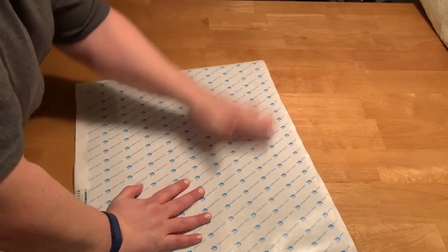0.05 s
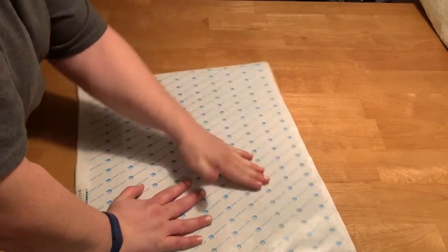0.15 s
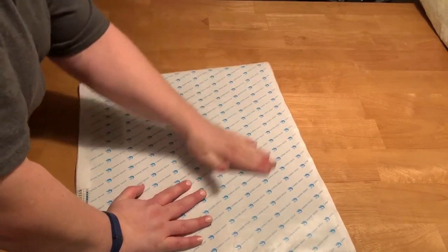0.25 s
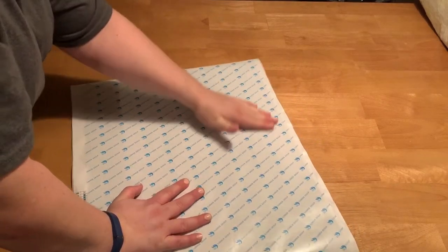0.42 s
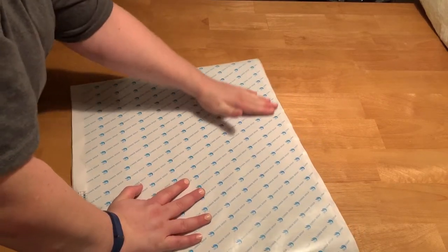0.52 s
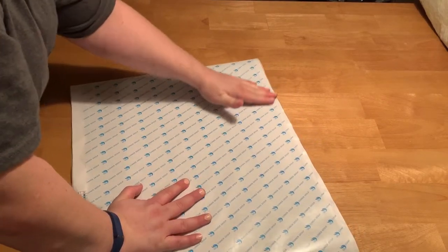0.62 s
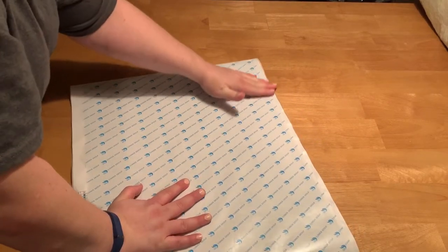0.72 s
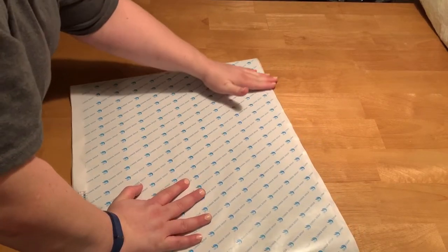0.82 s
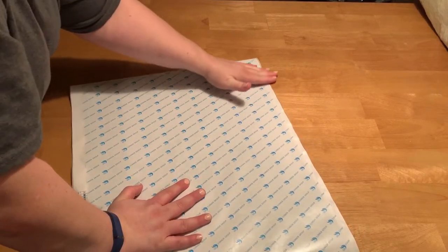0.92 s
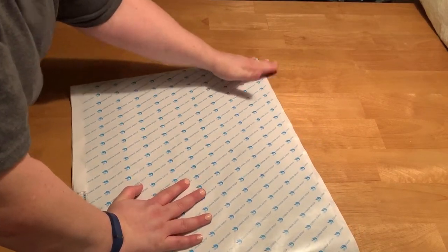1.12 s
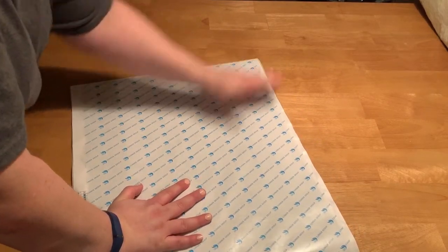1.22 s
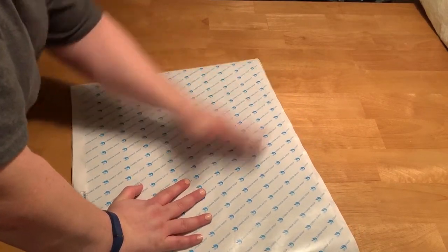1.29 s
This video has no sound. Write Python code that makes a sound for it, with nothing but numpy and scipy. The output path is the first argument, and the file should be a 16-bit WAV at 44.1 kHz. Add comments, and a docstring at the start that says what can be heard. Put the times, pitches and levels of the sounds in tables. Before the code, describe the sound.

A palm sweeps across a plastic sheet on a wooden table, with one sharp crackling snap

```python
"""Palm sweeping a plastic cover sheet

A small quiet room with a faint wavering hum; a wooden table under a plastic sheet, heard in mono.
A palm lands, sweeps across and lifts off: shaped noise for skin on film, close and with no room on it.
The sheet snaps once sharply, with quick reflections, and ticks softly (damped broad resonances);
the table thuds (decaying sines). Snaps, flaps and thuds also return from the walls as a short noise tail."""
import sys
import numpy as np
from scipy import signal
from scipy.fft import rfft, irfft, next_fast_len
from scipy.io import wavfile
from scipy.ndimage import map_coordinates

SR = 44100
rng = np.random.default_rng(int(sys.argv[2]) if len(sys.argv) > 2 else 0)


def wrap_up_sound(samples):
    """Save the sound to the file named by the first command line argument, as 16-bit audio."""
    columns = np.atleast_2d(samples).T
    # keep every value between -1 and 1, then stretch to whole-number steps
    tamed = np.clip(columns, -1, 1)
    steps = np.round(tamed * 32767).astype(np.int16)
    wavfile.write(sys.argv[1], SR, steps)


N = 59535
T = np.arange(N) / SR


def amp(db):
    """Decibels to gain."""
    return 10 ** (np.asarray(db) / 20)


def unit(x):
    """Scale to rms 1."""
    return x / np.sqrt(np.mean(x ** 2) + 1e-20)


def decay(t, t60):
    """Exponential decay that falls 60 dB in t60 seconds."""
    return np.exp(-np.log(1000) * t / t60)


def wobble(rate):
    """A smooth random curve with rate knots a second."""
    knots = rng.standard_normal(int(N * rate / SR) + 4)
    return map_coordinates(knots, [T * rate])


def filtered(x, response):
    """Multiply the spectrum of x by a response of frequency."""
    size = next_fast_len(N + 8192)
    hz = np.fft.rfftfreq(size, 1 / SR)
    return irfft(rfft(x, size) * response(hz), size)[:N]


def noise(points):
    """Noise of rms 1, its spectrum drawn through (pitch_hz, level_db) points."""
    point_hz, point_db = np.transpose(points)

    def response(hz):
        return amp(np.interp(np.log(hz + 1), np.log(point_hz), point_db))

    return unit(filtered(rng.standard_normal(N), response))


def add(track, start_s, sound):
    """Mix a sound into the track at start_s, cut at the track's end."""
    part = track[round(start_s * SR):][:len(sound)]
    part += sound[:len(part)]


# Spectrum of the quiet room: pitch_hz, level_db (relative, per Hz)
ROOM_NOISE = [(22, -37), (40, -9.5), (58, 3), (90, -1.5), (150, -8), (240, -1), (400, -11), (800, -13.5),
              (1150, -17.5), (1600, -15.5), (2400, -24), (3500, -24.5), (4200, -47), (15500, -44.5),
              (16500, -52.5)]
# Steady hum lines, before waver and swell: pitch_hz, level_db (rms)
HUM_LINES = [(118.6, -61.5), (215.3, -71.5), (290.7, -75), (527.6, -76)]
# Slow swell of the lowest hum line: time_s, change_db
LOW_HUM_SWELL = [(0, 4.5), (.15, -3.5), (.35, -8), (.63, -7), (.78, 1), (1.12, 2.5), (1.35, -7.5)]
ROOM_NOISE_DB, HUM_WAVER_DB = -59, 1  # rms level; typical waver


def background():
    """Room noise, and hum as sines that waver in level; the lowest also swells and sinks."""
    lines = []
    for hz, db in HUM_LINES:
        level = amp(db + HUM_WAVER_DB * wobble(5.11))
        lines.append(level * np.sqrt(2) * np.sin(2 * np.pi * (hz * T + rng.random())))
    swell = amp(np.interp(T, *np.transpose(LOW_HUM_SWELL)))
    return amp(ROOM_NOISE_DB) * noise(ROOM_NOISE) + swell * lines[0] + sum(lines[1:])


def room(x):
    """Diffuse answer from the walls: a decaying noise tail after a short gap."""
    t60_s, level_db, gap_s = 0.12, -9.5, 0.0036
    tail = rng.standard_normal(N) * decay(T, t60_s) * (T > gap_s)
    return amp(level_db) * signal.fftconvolve(x, tail / np.linalg.norm(tail))[:N]


# The hand pressing on the table: start_s, level_db
THUMPS = [(.008, -54.5), (0.2466, -51), (0.2552, -41), (0.403, -54.5), (1.187, -50)]
# Low modes of the table top: pitch_hz, level_db (relative), t60_s
TABLE_MODES = [(91.2, -1.5, 0.13), (189, -4.5, .07), (259, -3, 0.058), (302, 2.5, 0.063),
               (350.3, -1.5, 0.056), (805, -13.5, 0.032)]


def table():
    """The soft palm rings the table's modes; their balance varies a little with each press."""
    attack_s = 0.0024
    out = np.zeros(N)
    for start_s, db in THUMPS:
        ring = np.zeros(N)
        for hz, mode_db, t60 in TABLE_MODES:
            level = amp(mode_db + rng.normal(0, 1))
            ring += level * decay(T, t60) * np.sin(2 * np.pi * hz * T)
        soft_onset = 1 - np.exp(-T / attack_s)
        add(out, start_s, amp(db) * ring * soft_onset)
    return out


def pop(hz, octaves, t60, size=4096):
    """A sudden push and a short random flutter, through one broad resonance of the sheet."""
    flutter_attack_s, flutter_db = 0.00048, -10
    t, f = np.arange(size) / SR, np.fft.rfftfreq(size, 1 / SR)
    distance = np.log2((f + 20) / hz) / octaves
    log_gain = -np.log(1 + distance ** 2 / 2) * 2
    # Folding the cepstrum gives minimum phase: the push starts at once.
    cepstrum = irfft(log_gain)
    cepstrum[1:size // 2] *= 2
    cepstrum[size // 2:] = 0
    push = irfft(np.exp(rfft(cepstrum)))
    flutter = unit(irfft(rfft(rng.standard_normal(size)) * rfft(push)))
    envelope = decay(t, t60) * (1 - np.exp(-t / flutter_attack_s))
    return push / np.abs(push).max() + amp(flutter_db) * flutter * envelope


# Snaps and ticks of the sheet, and the first quick reflections after the sharp snap:
# start_s, level_db, pitch_hz, width_octaves, t60_s (of the flutter)
SNAPS_AND_REFLECTIONS = [(0.0226, -39, 3000, 0.58, .008), (.2400, -34.5, 3400, 0.57, 0.0042),
                         (0.2444, -31, 3300, 0.44, 0.01), (0.2455, -29.5, 3300, 0.44, 0.0088),
                         (.4198, -32, 11500, .3, .004), (0.4236, -12.5, 8840, 1.07, 0.017),
                         (.4256, -22, 4800, 0.65, 0.017), (0.4275, -20, 8700, 0.76, 0.029),
                         (0.4258, -33.5, 1960, 0.6, 0.027), (0.4764, -28, 7600, 0.28, .006),
                         (0.4782, -36.5, 7440, 0.26, .005), (.4910, -30.5, 5060, 0.89, 0.0053),
                         (1.334, -56.5, 3000, 0.75, 0.0073)]
# The sheet flapping on the wood: start_s, level_db
FLAPS = [(0.2462, -43), (1.182, -44.5), (1.194, -42.5), (1.2062, -51)]
# Resonances of the flapping film: pitch_hz, level_db (relative), width_octaves, t60_s (of the flutter)
FILM_RESONANCES = [(1140, -1, 0.41, 0.054), (1930, -1, 0.73, 0.012), (3480, -8.5, 0.058, 0.026),
                   (4800, -5.5, 0.16, 0.026), (6540, -10.5, 0.11, 0.027)]


def sheet():
    """Snaps, ticks and reflections use one resonance each; the film flaps on the wood in several."""
    out = np.zeros(N)
    for start_s, db, hz, octaves, t60 in SNAPS_AND_REFLECTIONS:
        add(out, start_s, amp(db) * pop(hz, octaves, t60))
    for start_s, db in FLAPS:
        for hz, resonance_db, octaves, t60 in FILM_RESONANCES:
            add(out, start_s, amp(db + resonance_db) * pop(hz, octaves, t60))
    return out


# Course of the sliding hand, before the layer trims: time_s, brush_db, rub_db, hiss_db
STROKE = [(0, -65, -69, -78), (0.034, -73, -67.5, -90), (0.065, -70.5, -83, -91),
          (0.214, -78.0, -81.5, -92), (0.233, -66, -63.5, -74), (0.256, -65.5, -51, -59.5),
          (0.283, -64.5, -62, -74), (0.31, -79, -59, -58.5), (0.365, -66, -51, -54), (0.41, -59, -50, -52),
          (0.48, -55, -50, -51), (0.545, -62.5, -57, -58), (0.7, -66, -59, -60), (0.82, -68.0, -61, -63),
          (0.95, -77, -63.5, -74), (1.08, -72, -63, -79), (1.176, -69.5, -72.5, -83),
          (1.236, -72, -68, -81.5), (1.259, -80, -84, -86), (1.35, -89, -85.5, -90)]
# Spectrum of the dull brush of the palm: pitch_hz, level_db (relative, per Hz)
BRUSH = [(150, -19), (370, -0.5), (650, -1.5), (1000, -1), (1500, 2), (2100, -1), (2600, -5.5), (4000, -28)]
# Spectrum of the rub of skin on film: pitch_hz, level_db (relative, per Hz)
RUB = [(500, -28), (1500, -11.5), (2500, -5.5), (3050, 3), (3500, 1.5), (3950, -1), (5100, 0), (7100, -1.5),
       (8600, -12.5), (16000, -32.5)]
# Spectrum of the fine hiss of fast sliding: pitch_hz, level_db (relative, per Hz)
HISS = [(3000, -41.5), (6500, -8.5), (8000, -1), (9600, 1), (11000, -1.5), (12400, 0.5), (14000, -2.5),
        (15700, -5), (16200, -35)]
BRUSH_TRIM_DB, RUB_TRIM_DB, HISS_TRIM_DB = 1.5, 2, 0.5
GRAIN_DB, GRAINS_PER_S = 0.8, 700


def sliding_hand():
    """Skin catches finely on the film: three noise bands follow the stroke under one shared grain."""
    time_s, brush_db, rub_db, hiss_db = np.transpose(STROKE)
    grain = unit(amp(GRAIN_DB * wobble(GRAINS_PER_S)))
    brush = amp(np.interp(T, time_s, brush_db) + BRUSH_TRIM_DB) * noise(BRUSH)
    rub = amp(np.interp(T, time_s, rub_db) + RUB_TRIM_DB) * noise(RUB)
    hiss = amp(np.interp(T, time_s, hiss_db) + HISS_TRIM_DB) * noise(HISS)
    return grain * (brush + rub + hiss)


def scene():
    """All sources, the same in both channels; only the contacts excite the room."""
    contacts = sheet() + table()
    mono = contacts + room(contacts) + sliding_hand() + background()
    return np.tile(mono, (2, 1))


def record(dry):
    """The recorder keeps nothing above its band limit."""
    top_hz = 15950
    return np.array([filtered(x, lambda hz: hz < top_hz) for x in dry])


dry = scene()
out = record(dry)
wrap_up_sound(out)
```